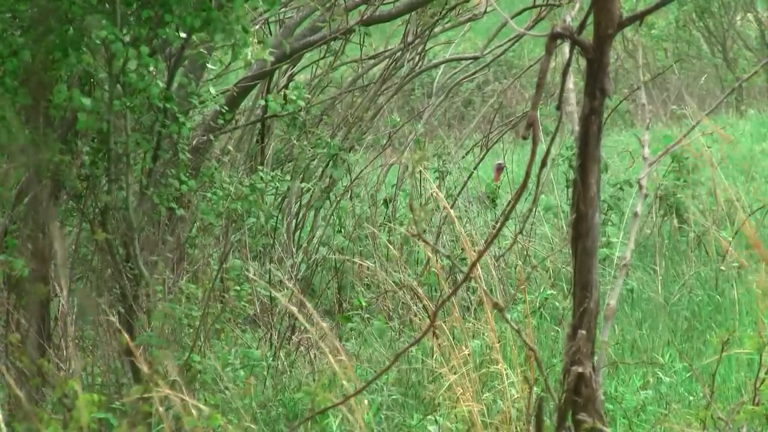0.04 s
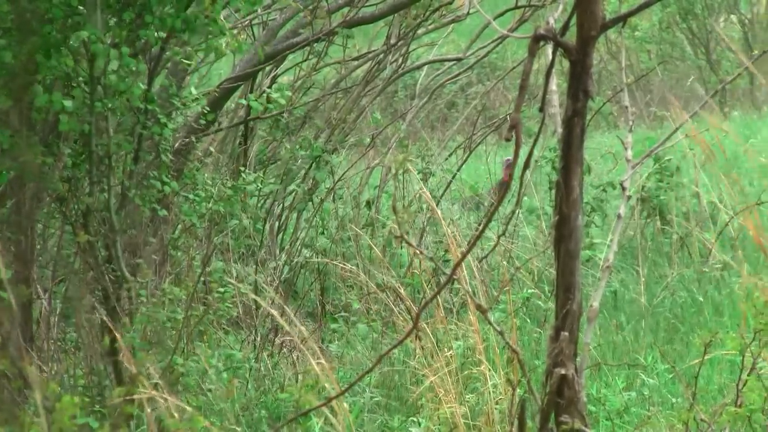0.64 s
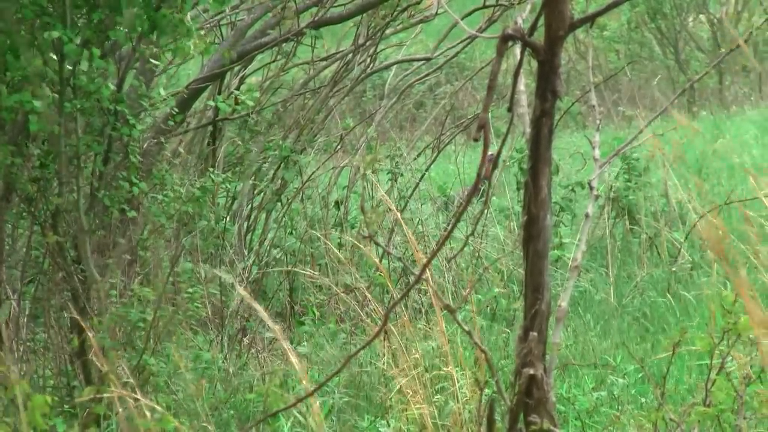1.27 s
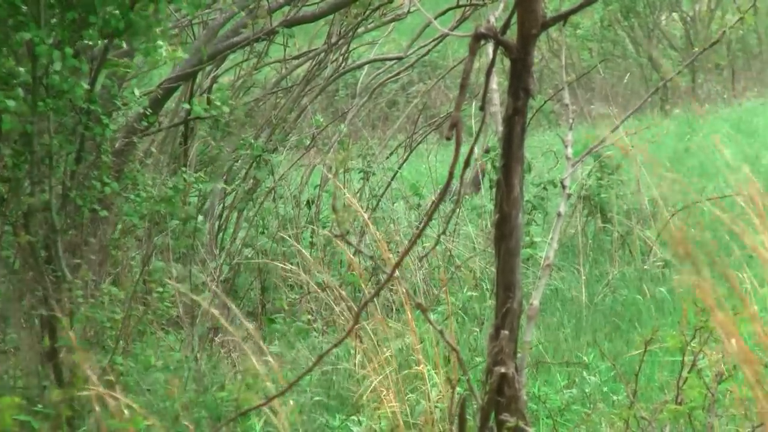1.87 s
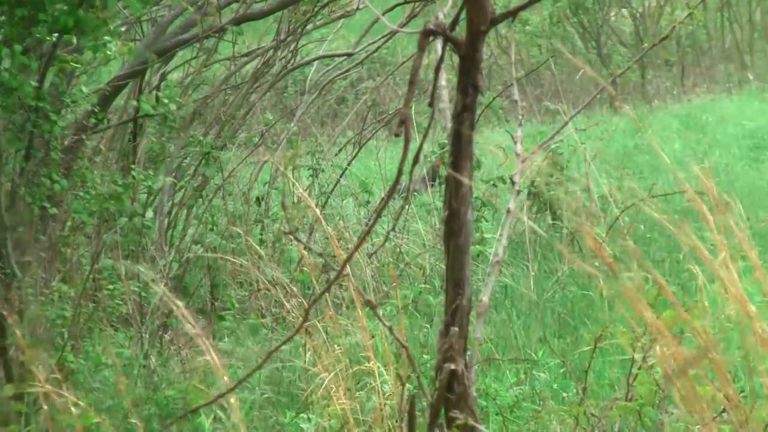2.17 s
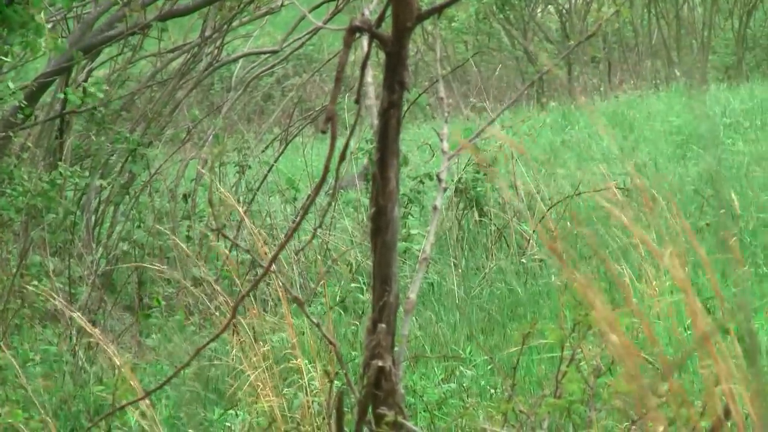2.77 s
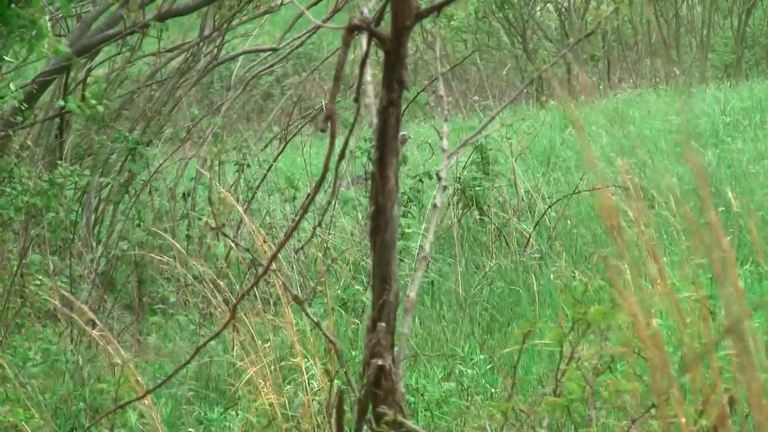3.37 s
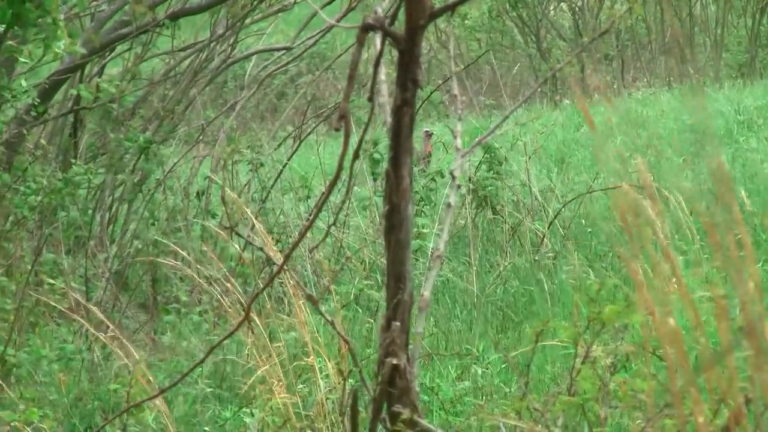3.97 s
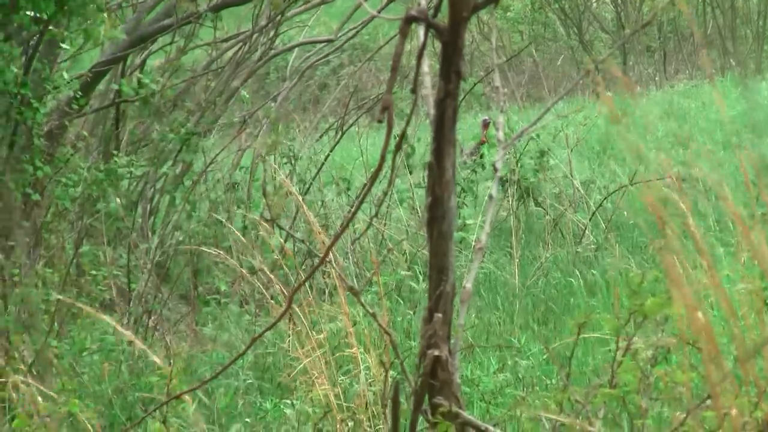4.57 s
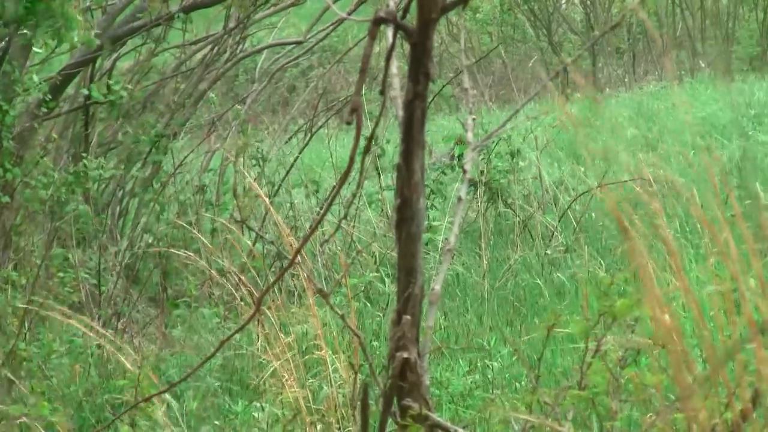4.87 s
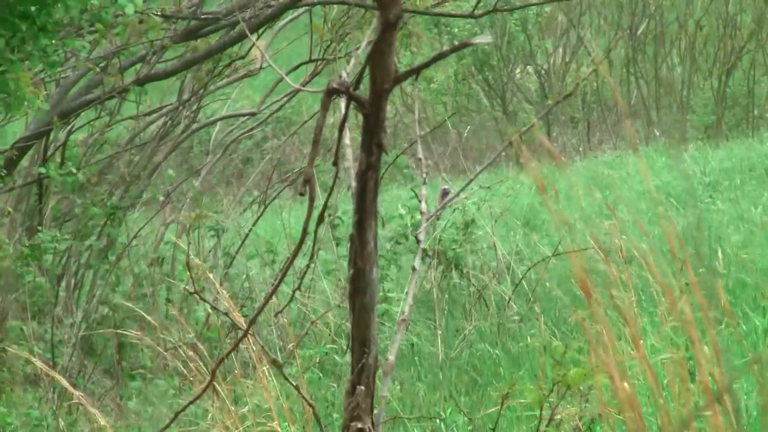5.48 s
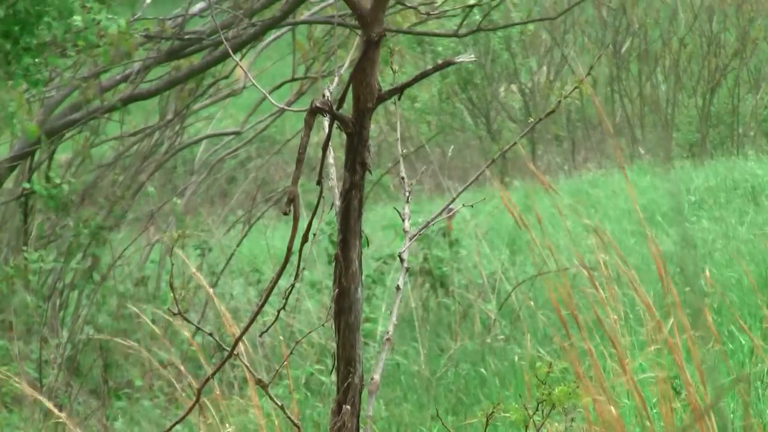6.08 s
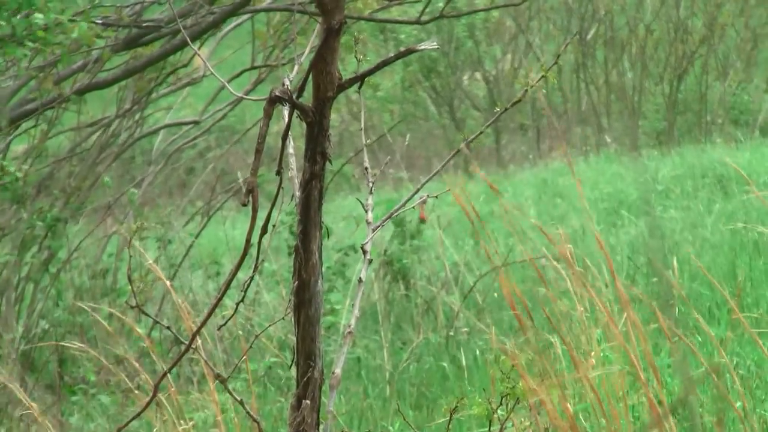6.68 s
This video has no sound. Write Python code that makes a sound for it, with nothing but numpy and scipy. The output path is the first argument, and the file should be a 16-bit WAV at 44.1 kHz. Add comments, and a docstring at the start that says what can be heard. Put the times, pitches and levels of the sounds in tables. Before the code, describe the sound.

A turkey gives seven loud, evenly spaced yelps close by, then faint wind rustle and distant songbirds remain.

```python
"""A meadow rustles steadily in the wind, a twig ticks, and a turkey gives seven loud, evenly spaced yelps
close by. Each cracks in on the throat resonance, drops to a raspy low note as the syrinx slackens and
flips up again; it overloads the microphone and ducks the rustle. Far songbirds whistle and twitter in
the trees between and after the yelps, with a few more twig ticks and soft puffs of wind on the mic."""
import sys
import numpy as np
from scipy import signal
from scipy.fft import rfft, irfft
from scipy.io import wavfile
from scipy.ndimage import uniform_filter1d

SR = 44100
rng = np.random.default_rng(int(sys.argv[2]) if len(sys.argv) > 2 else 0)


def int16_out(signal):
    """Quantize to a 16-bit WAV file."""
    q = np.round(np.clip(np.atleast_2d(signal).T, -1, 1) * 32767)
    wavfile.write(sys.argv[1], SR, q.astype(np.int16))


N = 297234
TIME = np.arange(N) / SR


def from_db(db):
    """Decibels to gain."""
    return 10 ** (np.asarray(db) / 20)


def rms_one(x):
    """Scale to unit power."""
    return x / np.sqrt(np.mean(x ** 2) + 1e-20)


def at_hz(points, hz):
    """Read a curve of (freq_hz, value) points on a log-frequency axis."""
    freq, value = np.transpose(points)
    return np.interp(np.log(np.maximum(hz, 1)), np.log(freq), value)


def band(x, low_hz, high_hz, order=2):
    """Butterworth band-pass."""
    sos = signal.butter(order, [low_hz, min(high_hz, .45 * SR)], "band", fs=SR, output="sos")
    return signal.sosfilt(sos, x + 1e-18)


def wander(size, rate_hz):
    """Random modulator with a spread of about 1, gliding to `rate_hz` new values a second."""
    knots = np.arange(size) * rate_hz / SR
    return np.interp(knots, np.arange(2000), rng.standard_normal(2000))


def swell(t, length, rise, fall):
    """Envelope with a rounded fade-in and fade-out."""
    fade_in = np.sin(np.pi / 2 * np.clip(t / rise, 0, 1))
    fade_out = np.sin(np.pi / 2 * np.clip((length - t) / fall, 0, 1)) ** 2
    return fade_in * fade_out


def add(out, start_s, sound):
    """Mix a sound in at its start time."""
    at = max(int(start_s * SR), 0)
    out[at:at + len(sound)] += sound[:N - at]


# EQ curve of the wind bed: freq_hz, gain_db
RUSTLE_EQ = [(25, -26), (56, -14), (100, -2.5), (230, -3), (350, 0), (520, -2), (700, -6), (950, -6.5),
             (1450, -18.5), (2200, -17), (4000, -21), (7000, -25), (11000, -31.5), (15500, -31)]
# Stereo image of the wind bed: freq_hz, left_right_correlation
RUSTLE_IMAGE = [(60, 0.99), (130, 0.8), (640, 0.58), (1400, 0.51), (3100, 0.53), (6800, 0.043),
                (14000, -0.23)]


def meadow_rustle(level_db=-34.5, flicker_db=1.2):
    """Far wind in grass and trees: flickering half-octave bands, centred lows and diffuse highs."""
    out, edges_hz = 0, 22 * 2 ** np.arange(0, 10, .5)
    white = rng.standard_normal((2, 2, N))
    for k, (low, high) in enumerate(zip(edges_hz, edges_hz[1:])):
        mid, side = band(white[k % 2], low, high)
        hz = np.sqrt(low * high)
        alike = at_hz(RUSTLE_IMAGE, hz)
        gain = from_db(at_hz(RUSTLE_EQ, hz) + flicker_db * wander(N, 12))
        out = out + gain * (np.sqrt(1 + alike) * mid + np.sqrt(1 - alike) * side * [[1], [-1]])
    return from_db(level_db) * rms_one(out)


# Ticks of dry twigs and stalks: start_s, peak_db, ring_hz
TWIG_TICKS = [(0.051, -32.5, 1900), (1.566, -21.5, 1270), (2.674, -24, 1790), (2.860, -28, 2100),
              (5.621, -31.5, 2820), (6.528, -30, 3080)]


def twigs(decay_s=0.0027):
    """Dry twigs snap: short noise bursts with a broad ring."""
    out, t = np.zeros(N), np.arange(int(0.044 * SR)) / SR
    for start_s, peak_db, ring_hz in TWIG_TICKS:
        burst = rng.standard_normal(len(t)) * np.exp(-t / decay_s)
        snap = band(burst, ring_hz / 2, ring_hz * np.sqrt(2), order=3)
        add(out, start_s, from_db(peak_db) * snap / np.abs(snap).max())
    return out


# Tone colour of the membrane's rattle as it leaves the beak: freq_hz, gain_db
RASP_EQ = [(400, -36.5), (560, -22), (760, 5.5), (980, 4.5), (1180, 2.5), (1450, -4.5), (1750, -12),
           (2080, -8.5), (2320, -13), (2600, -36.5), (3600, -30), (5000, -66), (9000, -69)]


def rasp(size):
    """Chaotic membrane motion: noise that rings in the throat."""
    colour = from_db(at_hz(RASP_EQ, np.arange(size + 1) * SR / (2 * size)))
    spectrum = rfft(rng.standard_normal(2 * size))
    return rms_one(irfft(spectrum * colour)[:size])


def scrape(lead_s, level_db, low_hz=1150, high_hz=2600):
    """Air rubs through the throat just before the voice catches."""
    t = np.arange(int((lead_s + 0.006) * SR)) / SR
    air = rms_one(band(rasp(len(t)), low_hz, high_hz))
    return from_db(level_db) * air * swell(t, t[-1], lead_s * 0.56, 0.0066)


# Formants of the throat and beak: freq_hz, gain_db
THROAT_EQ = [(300, -42.5), (480, -10), (560, -7), (700, -10.5), (870, -0.5), (980, -0.5), (1200, -2),
             (1400, -14.5), (1700, -18), (2030, -14.5), (2300, -30), (2600, -42.5), (3400, -42.5),
             (9000, -64.5)]


def yelp(length, low_hz, upturn_s, level_db, bright_db, start_hz=950, end_hz=1079, drop_s=0.0088,
         slack_hz=555, jitter=0.066, shimmer=0.26, uneven=1.4, sub_db=2.5, slope_db_per_octave=-2.5,
         taut_db_per_octave=-18.5, throat_hz=980, throat_width_hz=260):
    """The syrinx slackens and tightens: a U-shaped glide whose harmonics sweep the throat resonance."""
    span = length + 0.01
    t = np.arange(int(span * SR)) / SR
    # a slack membrane rasps; one that stays taut is cleaner, but repeats only every third cycle
    octaves_above_slack = np.log2(low_hz / slack_hz)
    roughness = from_db(-12 - 6 * octaves_above_slack)
    tripling_db = -37.5 + 46 * octaves_above_slack
    drop = (start_hz - low_hz) * np.exp(-t / drop_s)
    upturn = (end_hz - low_hz) * np.exp(np.minimum(t - length, 0) / upturn_s)
    pitch = (low_hz + drop + upturn) * (1 + jitter * roughness * wander(len(t), 500))
    phase = 2 * np.pi * np.cumsum(pitch) / SR
    # the tripled period puts partials between the harmonics
    thirds = np.arange(2, 25)[:, None]
    multiple, between = thirds / 3, thirds % 3 > 0
    partial_db = np.where(multiple < 1, sub_db, slope_db_per_octave * np.log2(multiple))
    partial_db = partial_db + between * (tripling_db + 3 * np.log2(multiple))
    # a taut membrane whistles almost purely: overtones fade as the pitch climbs
    tension = np.maximum(np.log2(pitch / 600), 0)
    partial_db = partial_db + taut_db_per_octave * tension * ((multiple > 1) & ~between)
    # the throat weights each partial and delays those above its resonance
    hz = multiple * pitch
    partial_db = partial_db + bright_db * np.clip(np.log2(hz / throat_hz), 0, 1) + at_hz(THROAT_EQ, hz)
    lag = np.arctan(2 * (hz - throat_hz) / throat_width_hz)
    # uneven cycles smear the upper harmonics
    smear = uneven * roughness * wander(len(t), 600) * np.maximum(multiple - 1.5, 0)
    tone = np.sum(from_db(partial_db) * np.cos(multiple * phase - lag + smear), axis=0)
    tone = tone * swell(t, span, 0.022, 0.017) * (1 + shimmer * roughness * wander(len(t), 400))
    # the rattle pulses once a cycle
    rattle = roughness * rasp(len(t)) * (1 + 0.14 * np.cos(phase)) * swell(t, span, 0.01, 0.023)
    return from_db(level_db) * (tone + rattle)


def crack(length, hz, level_db, overtone_db, waver=0.025):
    """The voice cracks: a nearly pure burst on the throat resonance."""
    t = np.arange(int(length * SR)) / SR
    phase = 2 * np.pi * np.cumsum(hz * (1 + waver * wander(len(t), 170))) / SR
    tone = np.sin(phase) + from_db(overtone_db) * np.cos(2 * phase)
    return from_db(level_db) * tone * swell(t, length, 0.0047, 0.29 * length)


# Cue list of the yelps: start_s, length_s, low_pitch_hz, upturn_s, level_db,
# crack_length_s, crack_pitch_hz, second_crack_length_s, second_crack_level_db
TURKEY_YELPS = [(.113, 0.07, 858, .007, -4.5, .006, 915, 0.02, -17),
                (.504, 0.078, 583, 0.0049, 1, 0.03, 998, 0.02, 1.5),
                (.877, .082, 583, 0.0097, 2, 0.03, 1006, 0.018, -1),
                (1.249, 0.086, 550, 0.0054, 2.5, 0.025, 975, .012, -12),
                (1.638, 0.083, 595, .013, -1, 0.039, 973, 0.02, -3),
                (2.019, .088, 551.7, 0.011, 0, .019, 948, 0.061, -4),
                (2.390, 0.073, 582.4, 0.0089, 1.5, 0.02, 965, 0.015, 2.5)]


def turkey(first_scrape_s=0.025, settled_scrape_s=0.0065, first_crack_db=0.85, settled_crack_db=3):
    """The run of yelps, each layered from a scrape, a glide and two cracks."""
    out = np.zeros(N)
    for k, cue in enumerate(TURKEY_YELPS):
        start_s, length, low_hz, upturn_s, level_db, crack_s, crack_hz, second_s, second_db = cue
        # as the bird gets going the scrape shortens and softens, the crack grows, the glide dulls
        lead_s = settled_scrape_s + (first_scrape_s - settled_scrape_s) * np.exp(-k / 0.7)
        crack_db = settled_crack_db + (first_crack_db - settled_crack_db) * np.exp(-k / 1.9)
        add(out, start_s - lead_s, scrape(lead_s, level_db=-24.5 - 1.7 * k))
        add(out, start_s, yelp(length, low_hz, upturn_s, level_db, bright_db=3.5 - 0.65 * k))
        add(out, start_s, crack(crack_s, crack_hz, crack_db, overtone_db=-23))
        add(out, start_s + 0.025, crack(second_s, crack_hz + 31.3, second_db, overtone_db=-20))
    return out


def woods_reverb(x, t60_s):
    """Trunks and leaves scatter a thin tail, different on each side."""
    t = np.arange(SR) / SR
    tail = rng.standard_normal((2, SR)) * from_db(-60 * t / t60_s) * np.minimum(t / 0.0063, 1)
    return signal.fftconvolve(x[None], tail / np.sqrt(np.sum(tail[0] ** 2)), axes=1)[:, :N]


def chirp(length, from_hz, to_hz, level_db, waver=0.012, flutter_db=3.0):
    """A songbird's thin, gliding whistle that flutters in pitch and level."""
    t = np.arange(int(length * SR)) / SR
    pitch = np.geomspace(from_hz, to_hz, len(t)) * (1 + waver * wander(len(t), 300))
    level = from_db(level_db + flutter_db * wander(len(t), 90)) * swell(t, length, 0.01, 0.015)
    return level * np.sin(2 * np.pi * np.cumsum(pitch) / SR)


# Background flurries of birdsong: start_s, end_s, low_pitch_hz, high_pitch_hz, level_db
FLURRIES = [(0.502, 1.1, 3680, 5740, -64), (3.421, 4.35, 3580, 6040, -47), (3.849, 4.7, 3306, 5640, -43.5),
            (4.85, 5.499, 1615, 4520, -48)]


def twitter(notes_per_flurry=70):
    """The furthest birds scatter short notes at random times and pitches."""
    out = np.zeros(N)
    for start_s, end_s, low_hz, high_hz, level_db in FLURRIES:
        for when, height, glide in rng.random((notes_per_flurry, 3)):
            hz = low_hz * (high_hz / low_hz) ** height
            note = chirp(0.022, hz, hz * (.85 + 0.41 * glide), level_db)
            add(out, start_s + when * (end_s - start_s), note)
    return out


# The clearest songbird notes: start_s, length_s, from_hz, to_hz, level_db
SONG_NOTES = [(.61, .025, 4120, 4450, -40), (0.773, 0.024, 4090, 4750, -33.5),
              (1.062, 0.019, 4120, 4550, -36), (3.39, .08, 4840, 3470, -43), (3.50, 0.071, 5430, 5550, -45),
              (3.636, 0.12, 4930, 4950, -43), (3.792, 0.034, 3860, 5260, -33.5),
              (3.83, .05, 6300, 3830, -37), (3.968, 0.073, 4700, 3920, -41), (4.043, .05, 4470, 5490, -44),
              (4.195, 0.124, 5000, 4730, -42), (4.326, 0.11, 3670, 4340, -42), (4.53, .07, 4680, 4130, -42),
              (4.627, 0.058, 2840, 3250, -39), (5.056, 0.12, 2934, 2947, -37),
              (6.053, .1, 3410, 4300, -40.5)]


def songbirds():
    """Songbirds whistle a few clear phrases."""
    out = np.zeros(N)
    for start_s, *note in SONG_NOTES:
        add(out, start_s, chirp(*note))
    return out


# Soft wind bumps on the mic: centre_s, half_width_s, level_db
WIND_PUFFS = [(2.355, .018, -32.5), (2.62, 0.063, -28.5), (3.264, .013, -22.5), (4.86, 0.13, -37),
              (5.022, 0.067, -29), (6.25, 0.02, -36)]


def wind_puffs(low_hz=72, high_hz=180, stereo_width=0.81):
    """Eddies thump on the microphone ports, partly alike on both."""
    force = sum(from_db(level_db) * np.exp(-.5 * ((TIME - centre_s) / half_width_s) ** 2)
                for centre_s, half_width_s, level_db in WIND_PUFFS)
    mid, side = band(rng.standard_normal((2, N)), low_hz, high_hz, order=3)
    return force * rms_one(mid + stereo_width * side * [[1], [-1]])


def scene(turkey_wet_db=-36, birds_direct_db=-5, birds_wet_db=-5):
    """Turkey up front, almost centred; songbirds deep in the trees, the furthest only as reverb."""
    call, birds = turkey(), songbirds()
    near = call + from_db(turkey_wet_db) * woods_reverb(call, t60_s=0.67)
    reverb_send = from_db(birds_wet_db) * birds + twitter()
    far = from_db(birds_direct_db) * birds + woods_reverb(reverb_send, t60_s=0.76)
    left, right = near + far + twigs()
    # calls and ticks reach the left port a sample early, and a shade weaker
    ports = np.array([left * from_db(-.2), np.r_[0, right[:-1]] * from_db(.2)])
    return ports + wind_puffs() + meadow_rustle()


def gain_control(x, threshold_db=-5.0, release_db_per_s=75, attack_s=0.0058):
    """Loud sound quickly ducks the whole mix; the gain creeps back at a steady rate."""
    power = uniform_filter1d(np.mean(x ** 2, axis=0), size=88)
    peak = np.sqrt(2 * np.maximum(power, 1e-12))
    excess_db = np.maximum(20 * np.log10(peak) - threshold_db, 0)
    release_db = release_db_per_s * TIME
    held_db = np.maximum.accumulate(excess_db + release_db) - release_db
    pole = np.exp(-1 / (attack_s * SR))
    duck_db = signal.lfilter([(1 - pole) ** 2], [1, -2 * pole, pole * pole], held_db)
    return x * from_db(-duck_db)


def record(dry, knee=4.44, lopsided=0.0089, cutoff_hz=16000):
    """Attacks slip past the gain control and soft-clip, a little unevenly; the top end is cut."""
    x = gain_control(dry)
    x = x / (1 + np.abs(x) ** knee) ** (1 / knee)
    x = x - lopsided * x ** 2
    return signal.sosfilt(signal.ellip(10, .1, 80, cutoff_hz, fs=SR, output="sos"), x)


dry = scene()
out = record(dry)
int16_out(out)
```